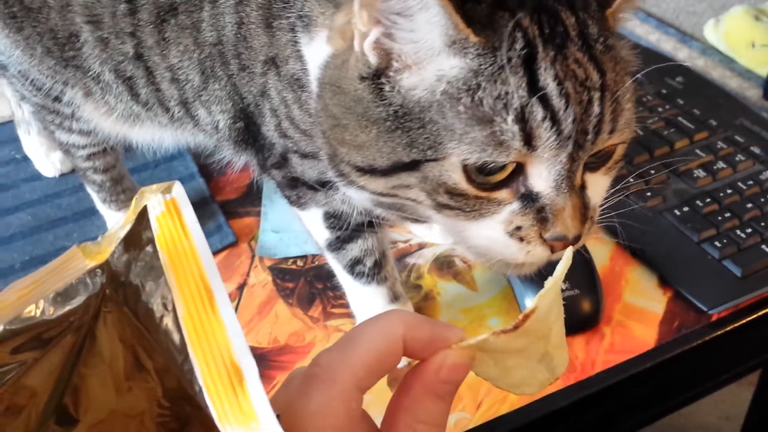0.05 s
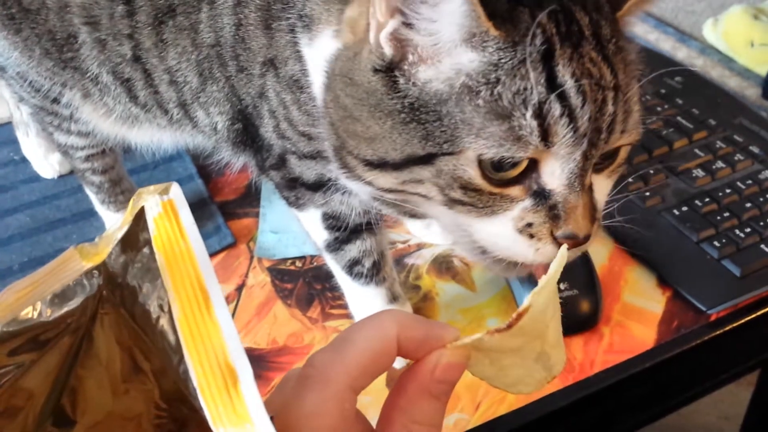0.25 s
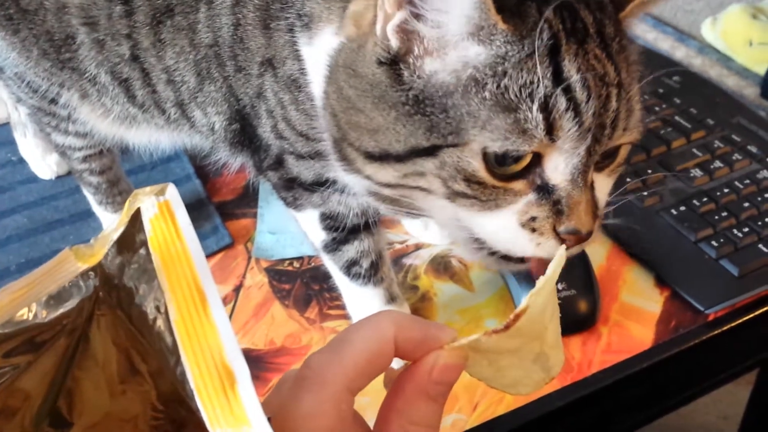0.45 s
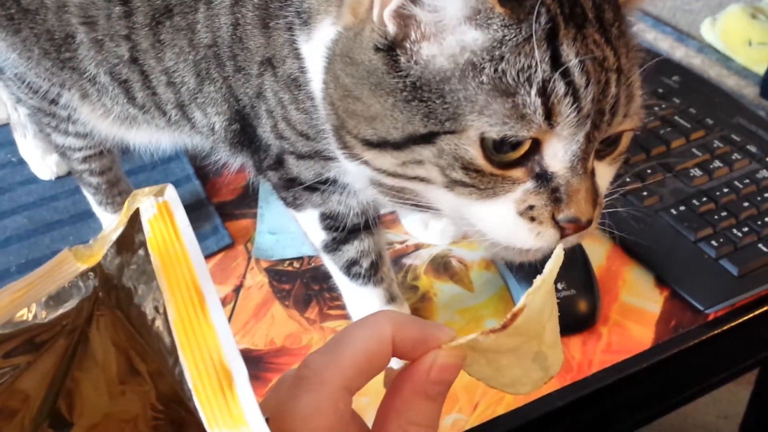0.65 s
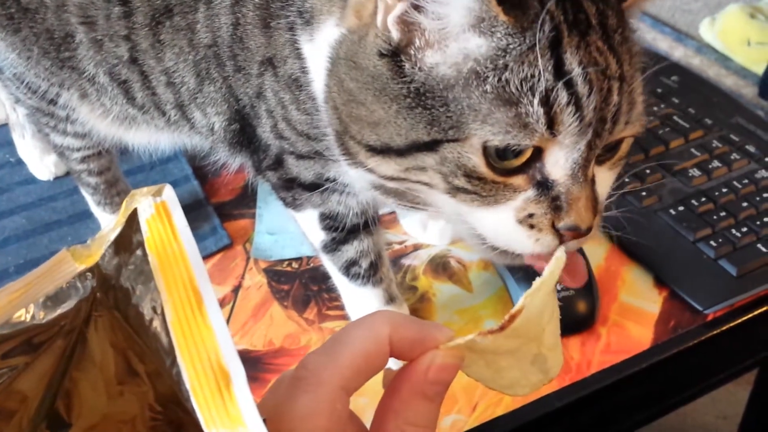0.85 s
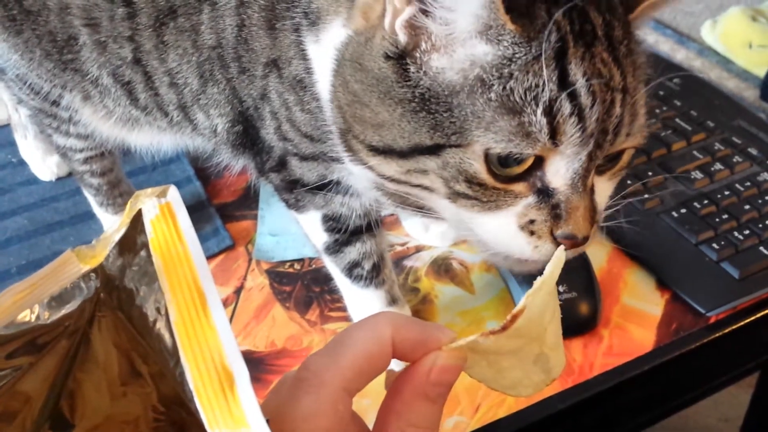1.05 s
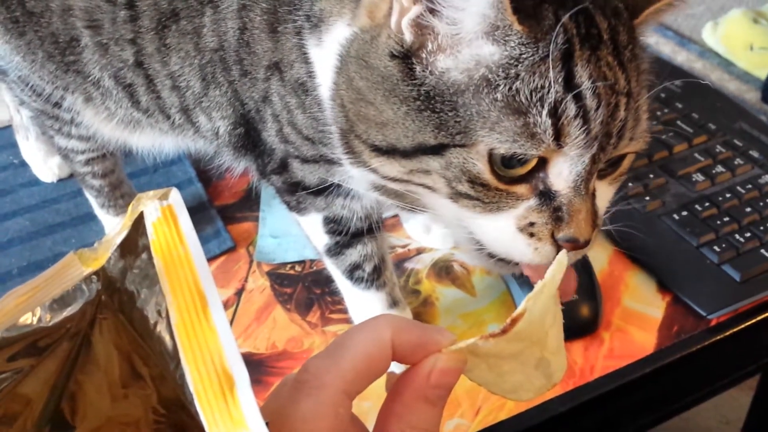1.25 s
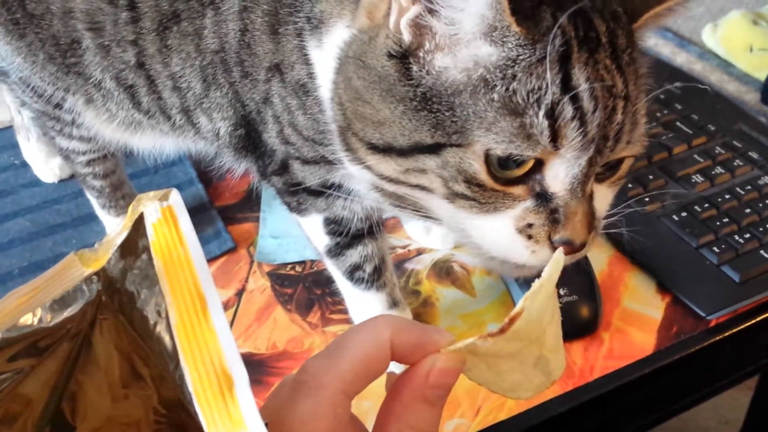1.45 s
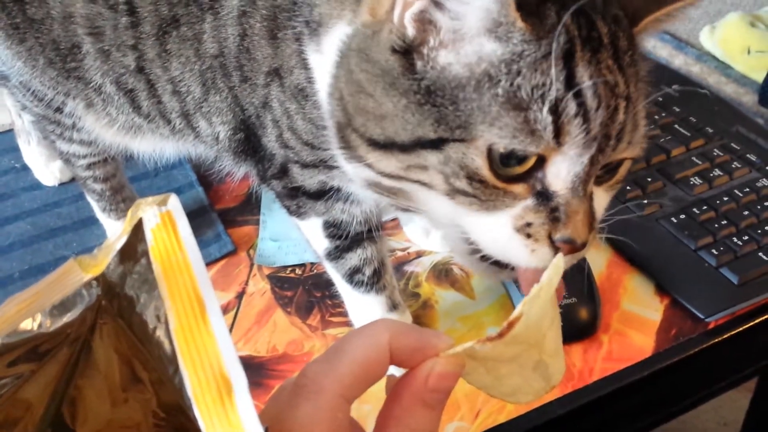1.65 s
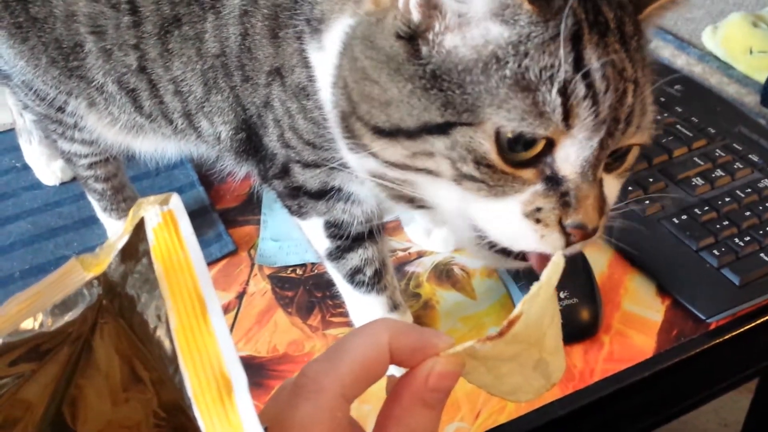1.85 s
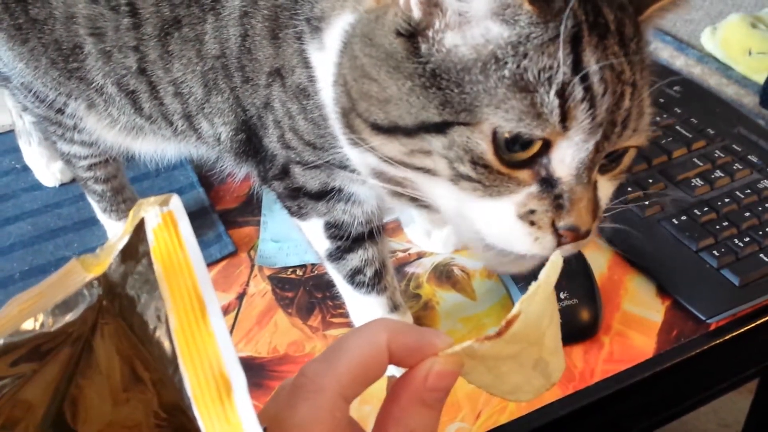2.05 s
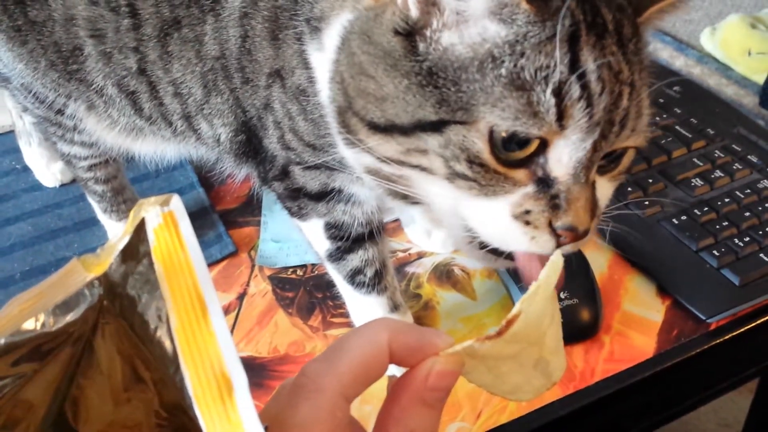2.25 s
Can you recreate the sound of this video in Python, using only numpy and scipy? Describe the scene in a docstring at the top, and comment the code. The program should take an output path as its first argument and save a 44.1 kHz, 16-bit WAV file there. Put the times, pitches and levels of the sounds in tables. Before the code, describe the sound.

A potato crisp snaps once at about 0.24 s, very sharp, bright and close, with fine splintering and a short small-room tail. A soft wet smack precedes it at 0.15 s. Then a cat's licking leaves sparse tiny ticks, with clearer clicks near 1.33, 1.6, 1.9 and 2.19 s, and very faint tongue rasps. A low, slightly wavering computer hum and soft hiss continue throughout; a barely audible low nudge comes at 1.9 s.

```python
"""A cat licks a potato crisp held close to the microphone in a small room.
The crisp snaps once, sharply: damped resonances ring, and nearby hard surfaces throw the crack back.
The mouth makes wet smacks and tiny ticks from damped pops; the tongue rasps faintly in dense grains.
Under it a computer hums in narrow noise bands, and the two microphone ports hiss, each with its own
colour. Late on, a hand nudges softly and low."""
import sys
import numpy as np
from scipy import signal
from scipy.fft import rfft, irfft
from scipy.io import wavfile

SR = 44100
rng = np.random.default_rng(int(sys.argv[2]) if len(sys.argv) > 2 else 0)


def generate_wav(signal):
    """Clip the signal to [-1, 1] and save it as 16-bit WAV at the path in sys.argv[1]."""
    frames = np.transpose(np.atleast_2d(signal))
    scaled = np.clip(frames, -1, 1) * 32767
    pcm = np.round(scaled).astype(np.int16)
    wavfile.write(sys.argv[1], SR, pcm)


N = 101430
TIME = np.arange(N) / SR
FREQS = np.fft.rfftfreq(N, 1 / SR)


def from_db(db):
    """Decibels to an amplitude factor."""
    return 10 ** (np.asarray(db) / 20)


def rms_one(x):
    """Scales a signal to an rms of one."""
    return x / np.sqrt(np.mean(x ** 2) + 1e-20)


def at_hz(points):
    """Each column of a spectrum table, read at every frequency along a log scale."""
    hz, *columns = np.transpose(points)
    return np.array([np.interp(np.log(FREQS + 1), np.log(hz), column) for column in columns])


def level_over_time(points):
    """Amplitude that follows a table of times and decibels."""
    return from_db(np.interp(TIME, *np.transpose(points)))


def colour(x, points):
    """Causal (minimum-phase) filter that follows a spectrum table."""
    cepstrum = irfft(np.log(from_db(at_hz(points))), N)
    # folding the cepstrum onto positive times makes the filter causal
    cepstrum[:, 1:N // 2] *= 2
    cepstrum[:, N // 2 + 1:] = 0
    return irfft(rfft(x) * np.exp(rfft(cepstrum)), N)


def delay(x, seconds):
    """The same sound, later."""
    return np.interp(TIME - seconds, TIME, x, left=0, right=0)


def swell(start_s, swell_s):
    """Envelope that rises to 1 in the swell time, then dies away."""
    age = np.clip((TIME - start_s) / swell_s, 0, 60)
    return age * np.exp(1 - age)


def pop(start_s, pitch_hz, swell_s, level_db):
    """A heavily damped resonance, set off once."""
    tone = np.sin(2 * np.pi * pitch_hz * (TIME - start_s))
    return from_db(level_db) * swell(start_s, swell_s) * tone


# hum bands of the computer: pitch_hz, width_hz (full width at half amplitude),
# level_db (rms, before the wavering)
HUM_BANDS = [(120.2, 12, -64), (161.3, 16, -69.5), (224.4, 22, -69), (250.6, 6, -63), (282.4, 33, -61),
             (768, 9.7, -79.5)]
# wavering of the hum: time_s, gain_db
HUM_WAVER = [(0, 4.5), (.45, 1), (.7, -0.5), (.9, -4), (1.3, -.5), (1.7, -1), (1.95, 4.5), (2.3, -5)]


def hum():
    """Fans and case hum: noise squeezed into narrow bands makes tones that waver by themselves."""
    tones = 0
    for pitch_hz, width_hz, level_db in HUM_BANDS:
        resonance = 1 / (1 + (2 * (FREQS - pitch_hz) / width_hz) ** 2)
        tone = irfft(rfft(rng.standard_normal(N)) * resonance, N)
        tones = tones + from_db(level_db) * rms_one(tone)
    return tones * level_over_time(HUM_WAVER)


# colour of fan air and port hiss: pitch_hz, left_db, right_db (both relative to AIR_DB)
AIR_COLOUR = [(25, -44, -21), (50, -17, -10.5), (75, -8, -10), (118, -2.5, -4.5), (227, -4, -0.5),
              (287, -4, -1.5), (414, -12, -10), (564, -13, -14), (1130, -15.5, -14.5), (1440, -21, -22),
              (1630, -16, -20.5), (2340, -21, -23.5), (3440, -24.5, -25), (5270, -25, -21.5),
              (6030, -24, -27), (6300, -25.5, -18.5), (8600, -29, -21), (10900, -29, -27),
              (15500, -29, -27.5)]
# left-right correlation of that noise: pitch_hz, likeness (0 = independent, 1 = identical)
AIR_LIKENESS = [(30, 0.21), (100, 0.95), (300, 0.92), (600, 0.48), (1200, 0.15), (3000, 0), (15000, 0)]
# slow rise and fall of that noise: time_s, gain_db
AIR_WAVER = [(0, 1), (.5, 1.5), (.85, -1), (1.25, 0), (1.45, 1), (1.75, -0.7), (1.95, 1), (2.3, -1)]
AIR_DB, HISS_TOP_HZ = -37, 15650


def air():
    """Fan air, alike on both sides in the bass, gives way to each port's own hiss."""
    mid, side = rfft(rng.standard_normal((2, N)))
    likeness = np.clip(at_hz(AIR_LIKENESS)[0], -1, 1)
    shared = np.sqrt(1 + likeness) * mid
    opposed = np.sqrt(1 - likeness) * side * [[1], [-1]]
    both = (shared + opposed) / np.sqrt(2)
    gain = from_db(AIR_DB + at_hz(AIR_COLOUR)) * (FREQS < HISS_TOP_HZ)
    return irfft(both * gain, N) * level_over_time(AIR_WAVER)


# colour of rasp, crackle and splinters: pitch_hz, gain_db
RASP_COLOUR = [(500, -11), (1500, 4.5), (3000, -3), (4500, 1), (6000, 4.5), (7500, -0.5), (10000, -4),
               (16000, -24)]


def rough(x):
    """Gives any noise the rasp colour and an rms of one."""
    return rms_one(colour(x, RASP_COLOUR)[0])


# wet smacks of tongue and lips: start_s, mouth_hz, mouth_db, mouth_swell_s,
# upper_hz, upper_db, upper_swell_s, crackle_db, crackle_swell_s, thump_db,
# room_db (what the room gets, relative to the direct smack)
SMACKS_HEARD = [(0.1478, 898, -42.5, 0.0024, 1070, -47, 0.0019, -75, .0006, -65, -12),
                (0.163, 1030, -45, 0.0012, 1700, -47, 0.0017, -63, .001, -70, -7),
                (1.0445, 1000, -57, .0007, 1710, -55, .0005, -68, .0012, -77, 5),
                (1.326, 1210, -30.5, 0.00051, 2615, -38, 0.00062, -34.5, 0.00069, -48, -1),
                (1.8983, 1620, -42.5, 0.00096, 410, -49.5, 0.0021, -51.5, 0.0022, -47.5, -6),
                (2.1851, 2380, -34.5, 0.00041, 2990, -34, 0.00036, -55, 0.00071, -58, -27)]
THUMP_HZ, THUMP_SWELL_S = 284, 0.0019


def smacks():
    """A film of saliva parts with a crackle and rings the mouth; the jaw thumps. Gives direct, to_room."""
    crackle = rough(rng.standard_normal(N))
    direct, to_room = 0, 0
    for (start_s, mouth_hz, mouth_db, mouth_swell_s, upper_hz, upper_db, upper_swell_s,
         crackle_db, crackle_swell_s, thump_db, room_db) in SMACKS_HEARD:
        smack = pop(start_s, mouth_hz, mouth_swell_s, mouth_db)
        smack = smack + pop(start_s, upper_hz, upper_swell_s, upper_db)
        smack = smack + pop(start_s, THUMP_HZ, THUMP_SWELL_S, thump_db)
        smack = smack + from_db(crackle_db) * swell(start_s, crackle_swell_s) * crackle
        direct = direct + smack
        to_room = to_room + from_db(room_db) * smack
    return direct, to_room


# tiny ticks of saliva: start_s, level_db, pitch_hz
SALIVA_TICKS = [(.1653, -47.5, 2800), (.497, -47, 6240), (.689, -48, 3000), (.826, -56, 3500),
                (1.038, -53, 1600), (1.160, -53, 2760), (1.3257, -40, 9300), (1.3262, -35.5, 4400),
                (1.327, -41.5, 6400), (1.349, -45, 2360), (1.351, -45, 5200), (1.473, -52, 5400),
                (1.557, -52, 3300), (1.607, -50, 2680), (1.6144, -41.5, 5800), (1.615, -64, 3200),
                (1.9005, -45.5, 2330), (1.9022, -54, 5540), (2.068, -43.5, 3050), (2.102, -51, 2200),
                (2.120, -54, 5800)]
TICK_SWELL_S = 0.00018


def ticks():
    """Small saliva bubbles burst, each a tiny damped pop."""
    return sum(pop(start_s, pitch_hz, TICK_SWELL_S, level_db)
               for start_s, level_db, pitch_hz in SALIVA_TICKS)


# what the snap rings with: pitch_hz, swell_s, left_db, right_db (both relative to SNAP_DB)
SNAP_RESONANCES = [(1314, 0.00057, -28, -35), (1830, 0.00037, -10, -22.5), (2280, 0.00022, -16.5, -32),
                   (4180, 0.00068, -28.5, -19), (5360, 0.00044, -7.5, -13.5), (5760, 0.00029, 4, -28),
                   (6330, 0.00022, -1.5, -12.5), (8700, 0.00017, -25, -2), (11020, 0.000085, -21, -12.5),
                   (13300, 0.00016, -25, -11)]
# reflections off desk, keyboard and screen: delay_s, left_db, right_db (relative to the direct crack)
SNAP_ECHOES = [(.0018, -16.5, -13), (.0027, -16.5, -16), (.0082, -31, -22), (.0098, -26, -44),
               (0.0114, -54, -28)]
SNAP_S, SNAP_DB = .2437, -5


def snap():
    """The crisp cracks and its resonances ring; hard things nearby throw the crack back."""
    sides = []
    for side in range(2):
        direct = 0
        for k, (pitch_hz, swell_s, *side_db) in enumerate(SNAP_RESONANCES):
            polarity = (-1) ** k  # neighbouring resonances start in opposite directions
            direct = direct + polarity * pop(SNAP_S, pitch_hz, swell_s, SNAP_DB + side_db[side])
        echoes = sum(from_db(side_db[side]) * delay(direct, delay_s)
                     for delay_s, *side_db in SNAP_ECHOES)
        sides.append(direct + echoes)
    return np.array(sides)


# dull knock of the crisp springing back: pitch_hz, swell_s, level_db
RECOIL_RESONANCES = [(422, 0.0019, -44.5), (1340, .0009, -43.5), (2870, 0.000353, -30)]
RECOIL_S = .2535
SPLINTER_DB, SPLINTER_SWELL_S = -34.5, 0.0029


def recoil():
    """The broken edge splinters finely from the snap on, then the crisp springs back."""
    splinters = swell(SNAP_S, SPLINTER_SWELL_S) * rough(rng.standard_normal(N))
    knock = sum(pop(RECOIL_S, *resonance) for resonance in RECOIL_RESONANCES)
    return from_db(SPLINTER_DB) * splinters + knock


# tongue strokes over the crisp: middle_s, half_length_s (to 1/e of the peak), level_db
TONGUE_STROKES = [(0.49, 0.027, -61.5), (0.936, 0.019, -63), (1.388, 0.011, -62), (1.882, 0.035, -63),
                  (2.237, 0.0059, -63)]
GRAINS_PER_S, GRAIN_SPREAD_DB = 2500, 2


def rasp():
    """The tongue's barbs catch on the crisp as a dense run of grains of uneven size."""
    size_db = GRAIN_SPREAD_DB * np.minimum(rng.exponential(1, N), 4)
    sizes = from_db(size_db) * rng.choice([-1, 1], N)
    catches = rng.random(N) < GRAINS_PER_S / SR
    grains = rough(sizes * catches)
    strokes = sum(from_db(level_db) * np.exp(-((TIME - middle_s) / half_length_s) ** 2)
                  for middle_s, half_length_s, level_db in TONGUE_STROKES)
    return grains * strokes


def nudge():
    """A soft nudge of the hand: one low, damped pop."""
    return pop(1.903, pitch_hz=71.5, swell_s=0.01, level_db=-52)


# how the two ports hear the small sounds: pitch_hz, left_db, right_db
PORT_COLOUR = [(293, 2.5, 6.5), (1140, -1, -4), (2100, 2, -2), (3434, 4, 0), (5700, 5.5, -8),
               (7100, -3.5, -10.5), (8770, -4, 2.5), (15000, -10, 0)]
SMALL_LOW_CUT_HZ, RIGHT_LEAD_S = 206, .00012


def at_ports(crack, small):
    """A low cut keeps the small sounds free of rumble; each port colours them, the right reached first."""
    low_cut = signal.butter(2, SMALL_LOW_CUT_HZ, "high", fs=SR, output="sos")
    small = signal.sosfilt(low_cut, small + 1e-18)
    left, right = crack + colour(small, PORT_COLOUR)
    # the lead is rounded down to whole samples
    return np.array([left, np.roll(right, -int(RIGHT_LEAD_S * SR))])


# colour of the reverberation: pitch_hz, level_db
ROOM_COLOUR = [(200, -9.5), (900, -8), (1800, -15), (3000, -8), (4400, -8), (5100, -8.5), (5700, -19),
               (6400, -18.5), (8000, -14.5), (9500, -22.5), (12000, -16.5), (15000, -19)]
ROOM_T60_S, ROOM_TREBLE_T60_S, ROOM_SPLIT_HZ = 0.31, 0.32, 6600
ROOM_DELAY_S, ROOM_BUILD_S, ROOM_CROSS_DB = 0.0063, 0.002, -14.5


def room(x):
    """A diffuse noise tail builds up quickly and decays; its treble lasts very slightly longer."""
    age = np.maximum(TIME - ROOM_DELAY_S, 0)
    white = rng.standard_normal((2, N))
    low = irfft(rfft(white) / (1 + (FREQS / ROOM_SPLIT_HZ) ** 8), N)
    treble = white - low
    tail = low * from_db(-60 * age / ROOM_T60_S) + treble * from_db(-60 * age / ROOM_TREBLE_T60_S)
    tail = tail * (1 - np.exp(-age / ROOM_BUILD_S))
    tail = rms_one(tail) / np.sqrt(N)  # unit energy, averaged over the two sides
    crossed = x + from_db(ROOM_CROSS_DB) * x[::-1]  # each side leaks into the other
    return signal.fftconvolve(colour(crossed, ROOM_COLOUR), tail, axes=1)[:, :N]


def scene():
    """The cat is close; room, hum and air lie behind it."""
    crack = snap()
    small = recoil() + ticks() + rasp()
    smack_direct, smack_to_room = smacks()
    close = at_ports(crack, small + smack_direct)
    reverberation = room(at_ports(crack, small + smack_to_room))
    return close + reverberation + nudge() + hum() + air()


def record(dry):
    """A steep elliptic low-pass cuts the top off at 16.6 kHz."""
    top_cut = signal.ellip(10, .1, 80, 16600, fs=SR, output="sos")
    return signal.sosfilt(top_cut, dry)


dry = scene()
out = record(dry)
generate_wav(out)
```